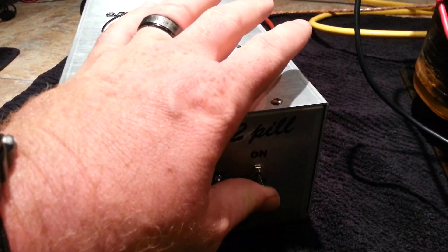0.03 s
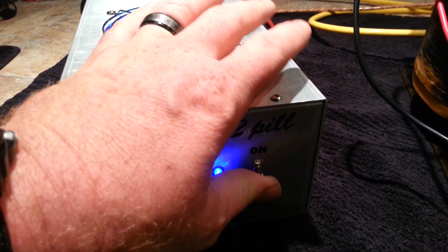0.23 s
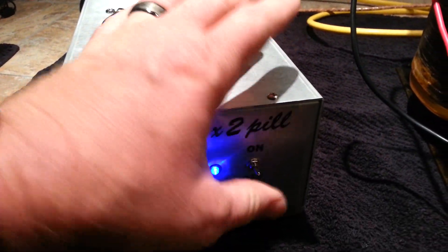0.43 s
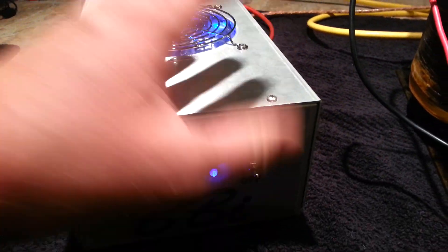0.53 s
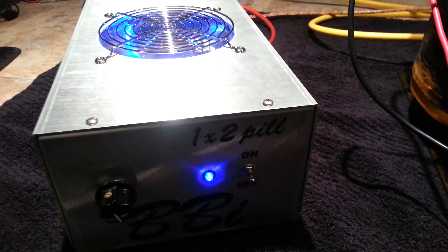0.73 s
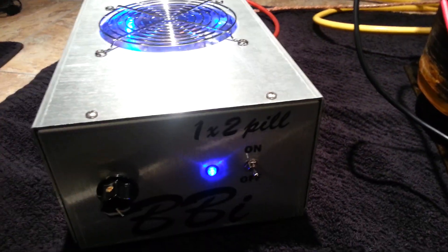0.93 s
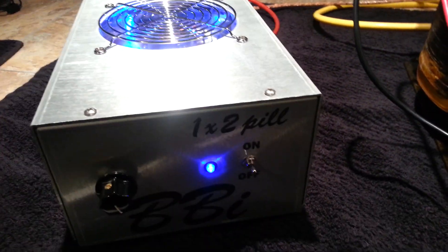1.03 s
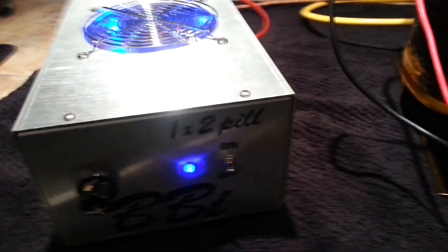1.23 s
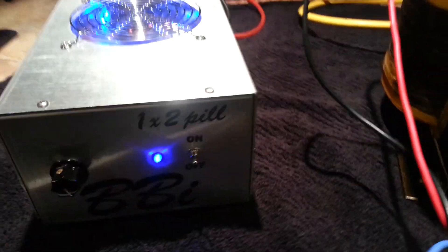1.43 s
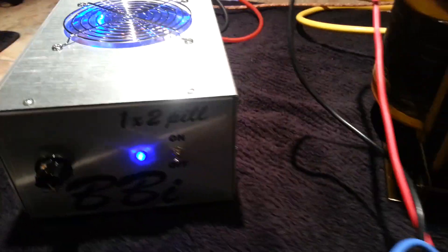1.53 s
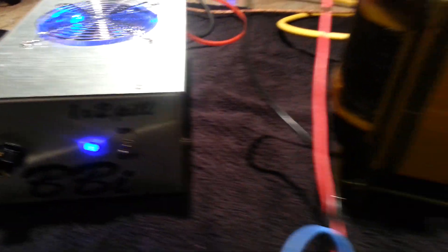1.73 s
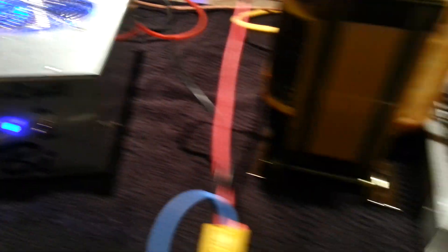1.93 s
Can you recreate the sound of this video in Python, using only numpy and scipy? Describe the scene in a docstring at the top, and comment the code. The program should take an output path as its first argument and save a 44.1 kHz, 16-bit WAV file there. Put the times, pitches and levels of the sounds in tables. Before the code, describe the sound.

A toggle switch snaps at about 0.2 s: a very loud, bright, close click of tightly bunched contacts, ringing a sheet-metal case for roughly 0.3 s with short room echo. Quiet mains hum, room noise and a faint pulsing insect trill run throughout. From 0.25 s a small fan softly ticks ever faster. Cloth rustles from 1 to 1.8 s, with tiny microphone knocks near 1.2 and 1.4 s.

```python
"""Mains hum, room noise and a far insect's trill come first.
A thumb then flips a metal toggle switch on a sheet-metal box: contacts ring the lever and crack,
the snap rings the case panels, the room echoes. The box's fan spins up, ticking ever faster.
Later cloth rustles (two noise bands) and the handheld microphone gets a few small knocks (damped modes)."""
import sys
import numpy as np
from scipy import signal
from scipy.io import wavfile

SR = 44100
rng = np.random.default_rng(int(sys.argv[2]) if len(sys.argv) > 2 else 0)


def unload_audio(sound):
    """Save the sound as a 16-bit wav file, at the path given as the first command line argument."""
    columns = np.transpose(np.atleast_2d(sound))
    # keep every value between -1 and 1, then stretch to whole-number steps
    steps = np.round(np.clip(columns, -1, 1) * 32767)
    wavfile.write(sys.argv[1], SR, steps.astype(np.int16))


N = 88200


def amp(db):
    """dB to gain."""
    return 10 ** (np.asarray(db) / 20)


def rms_one(x):
    """Scale to rms 1."""
    return x / np.sqrt(np.mean(x ** 2) + 1e-20)


def clock():
    """Time of each sample, s."""
    return np.arange(N) / SR


def at_hz(points, hz):
    """Read a (hz, value) table on a log-frequency axis."""
    table_hz, value = np.array(points).T
    return np.interp(np.log(hz), np.log(table_hz), value)


def drift(corner_hz):
    """Slow random wander, rms 1: noise through two equal poles, run at SR / 40."""
    step = 40
    r = np.exp(-2 * np.pi * corner_hz * step / SR)
    settle = 2000
    noise = rng.standard_normal(N // step + settle + 2)
    slow = signal.lfilter([1], [1, -2 * r, r * r], noise)[settle:]
    return np.interp(np.arange(N) / step, np.arange(len(slow)), rms_one(slow))


def clicks(start_s, gains):
    """One impulse per event."""
    out = np.full(N, 1e-18)  # floor avoids denormals
    np.add.at(out, (np.asarray(start_s) * SR).astype(int), gains)
    return out


def ring(x, hz, t60_s):
    """Damped resonator: a unit click starts a decaying sine of height 1."""
    r = amp(-60 / (t60_s * SR))
    w = 2 * np.pi * min(hz, 15000) / SR
    return signal.lfilter([0, np.sin(w)], [1, -2 * r * np.cos(w), r * r], x)


def strike(start_s, level_db, modes, scatter_db):
    """Every blow rings every mode with a random strength of its own."""
    scatter = scatter_db * rng.standard_normal((len(start_s), len(modes)))
    out = 0
    for k, (hz, mode_db, t60_s) in enumerate(modes):
        blows = clicks(start_s, amp(level_db + mode_db + scatter[:, k]))
        out = out + ring(blows, hz, t60_s)
    return out


def dying(x, t60_s):
    """Envelope: each click decays exponentially."""
    return signal.lfilter([1], [1, -amp(-60 / (t60_s * SR))], x)


# left-right correlation of noise: pitch_hz, likeness (0-1)
LIKENESS = [(60, 0.086), (300, 0.45), (700, 0.12), (1400, 0), (3000, 0), (14000, 0.018)]


def banded(spectrum, flicker_db, shape=lambda hz: 1):
    """Third-octave stereo noise, rms 1 before flicker and shape; each band has its own level and likeness."""
    settle = 8000
    edges_hz = 22 * 2 ** np.arange(0, 9.6, 1 / 3)
    white = rng.standard_normal((2, 2, N + settle))  # neighbouring bands use different noise
    out, power = 0, 0
    for k, (low, high) in enumerate(zip(edges_hz, edges_hz[1:])):
        hz = np.sqrt(low * high)
        if not spectrum[0][0] / 2 < hz < spectrum[-1][0] * 2:
            continue
        sos = signal.butter(2, [low, high], "band", fs=SR, output="sos")
        mid, side = signal.sosfilt(sos, white[k % 2])[:, settle:]
        alike = np.clip(at_hz(LIKENESS, hz), -1, 1)
        gain = amp(at_hz(spectrum, hz))
        power += gain ** 2 * (high - low) * 4.4 / SR  # 4.4: filter skirts, two-sided band, mid + side
        flicker = amp(flicker_db * drift(17)) if flicker_db else 1
        stereo = np.sqrt(1 + alike) * mid + np.sqrt(1 - alike) * side * [[1], [-1]]
        out = out + gain * flicker * shape(hz) * stereo
    return out / np.sqrt(power)


def place(x, left_minus_right_db, left_lag_s):
    """Stereo position by level difference and a delayed left channel."""
    t = clock()
    left = np.interp(t - left_lag_s, t, x) * amp(left_minus_right_db / 2)
    right = x * amp(-left_minus_right_db / 2)
    return np.array([left, right])


LOW_CUT_HZ = 351


def low_cut(x):
    """Fourth-order high-pass: the switch and knocks carry no deep bass."""
    return signal.sosfilt(signal.butter(4, LOW_CUT_HZ, "high", fs=SR, output="sos"), x)


MAINS_HZ, HUM_WAVER_DB = 60, .7
# mains harmonics: multiple, level_db (rms), left_minus_right_db
HUM = [(1, -74.5, -3), (2, -69.5, 0.5), (3, -86, -8.5), (4, -62.5, -1), (5, -64.5, 5.5), (6, -68, -1.5),
       (7, -71.5, -1), (8, -65, -1.5), (10, -71, -3.5)]


def hum():
    """Sines at mains multiples; each level wavers slightly."""
    out = 0
    for multiple, level_db, left_minus_right_db in HUM:
        cycles = multiple * MAINS_HZ * clock() + rng.random()
        channel_phase = rng.normal(0, 0.27, (2, 1))
        tone = np.sin(2 * np.pi * cycles + channel_phase)
        pan_db = left_minus_right_db * np.array([[.5], [-.5]])
        out = out + np.sqrt(2) * amp(level_db + HUM_WAVER_DB * drift(4.8) + pan_db) * tone
    return out


ROOM_START_DB, ROOM_RISE_DB_PER_S = -57.5, 2  # steady rise from time 0 stands for air from the fan
# room noise spectrum: pitch_hz, density_db (per Hz, relative)
ROOM = [(20, -29.5), (45, -16.5), (60, -18), (150, -10), (300, -11.5), (500, -16.5), (800, -19.5),
        (1200, -22), (2000, -26), (3500, -29), (6000, -34), (9000, -31.5), (14600, -32)]


def room():
    """Flickering broadband noise whose level climbs steadily."""
    return amp(ROOM_START_DB + ROOM_RISE_DB_PER_S * clock()) * banded(ROOM, 1.0)


INSECT_HZ, INSECT_WIDTH_HZ, INSECT_EDGE_S = 2314, 145, 0.075
# insect phrases: start_s, length_s, level_db
PHRASES = [(-.08, 0.33, -62), (0.473, 0.34, -64), (1.043, .32, -62), (1.661, 0.315, -62)]


def insect():
    """Narrow rough trill: noise through two equal resonators, gated into short phrases."""
    r = np.exp(-np.pi * INSECT_WIDTH_HZ / SR)
    w = 2 * np.pi * INSECT_HZ / SR
    tone = rng.standard_normal((2, N))
    for _ in range(2):
        tone = signal.lfilter([1, 0, -1], [1, -2 * r * np.cos(w), r * r], tone)
    t = clock()
    gate = 0
    for start_s, length_s, level_db in PHRASES:
        edge_distance_s = np.minimum(t - start_s, start_s + length_s - t)
        gate = gate + amp(level_db) * np.clip(edge_distance_s / INSECT_EDGE_S, 0, 1)
    return gate * rms_one(tone)


SNAP_S, SWITCH_LEFT_LAG_S = .2118, .00007
# sheet-metal panels, before the low cut: pitch_hz, level_db, t60_s
CASE = [(288, -34.5, 0.15), (349.3, -25, 0.32), (370.5, -23, 0.28), (392.3, -18, 0.29), (467, -32, 0.033),
        (668.5, -29.5, 0.32), (683.7, -28.5, 0.22), (735, -30.5, 0.14), (802.7, -27.5, 0.148),
        (809, -31, .3), (1052, -20, 0.082), (1407, -23, 0.081), (1490, -28, 0.075), (1640, -38.5, 0.086),
        (1920, -35, 0.18), (2125, -31, .3)]


def case():
    """The snap pushes the panels once; their modes ring."""
    return place(strike([SNAP_S], 0, CASE, 0.17), 0.1, SWITCH_LEFT_LAG_S)


LEVER_SCATTER_DB, LEVER_LEFT_MINUS_RIGHT_DB = 4.5, 3.5
# lever contacts (tick, snap, bounces): start_s, level_db
CONTACTS = [(0.2086, -18), (0.2106, -6), (0.2112, -1), (0.2117, -2), (0.2127, -3), (0.2158, -15),
            (0.2186, -14), (0.2205, -11), (0.2262, -17)]
# lever, bushing and front plate, relative to each contact: pitch_hz, level_db, t60_s
LEVER = [(820, -11, .012), (1834, -17, .02), (1960, -13, .022), (2180, -16, .02), (2420, -15, .03),
         (3270, -13, .012), (3500, -12, .012), (4840, -13, .007), (7050, -16, .005), (8580, -13, .005),
         (10900, -19, .005), (11700, -17, .005), (14250, -6, .003)]


def lever():
    """Every contact rings the lever, bushing and front plate."""
    start_s, level_db = np.transpose(CONTACTS)
    rung = strike(start_s, level_db, LEVER, LEVER_SCATTER_DB)
    return place(rung, LEVER_LEFT_MINUS_RIGHT_DB, SWITCH_LEFT_LAG_S)


CRACK_DB, CRACK_T60_S = -7.5, .006  # level relative to each contact
# crack spectrum: pitch_hz, density_db (per Hz, relative)
CRACK = [(180, -42), (300, -23), (1380, -27), (1980, -10), (4110, -3.5), (4910, -10.5), (6270, -12.5),
         (8680, -2), (13000, -22), (14600, -8)]


def crack():
    """Every contact also fires a dying burst of noise."""
    start_s, level_db = np.transpose(CONTACTS)
    envelope = dying(clicks(start_s, amp(level_db)), CRACK_T60_S)
    return amp(CRACK_DB) * envelope * banded(CRACK, 0)


EARLY_DB, EARLY_T60_S = -18, 0.044  # first reflections from bench and wall
TAIL_DB, ECHO_RISE_S = -22.5, 0.00343  # rise is a time constant
# echo spectrum, early and late: pitch_hz, density_db (per Hz, relative)
TAIL = [(300, -27), (600, -19), (800, -11), (1200, -24.5), (1500, -17), (1960, -12), (2600, -21.5),
        (3200, -20.5), (6000, -26.5), (14600, -24)]
# late echo decay: pitch_hz, t60_s
TAIL_T60 = [(200, 0.68), (1000, 0.36), (4000, 0.4), (14000, 0.19)]


def echo():
    """Room noise after the snap: a quick early decay over a late decay set per band."""
    after_s = np.maximum(clock() - SNAP_S, 0)
    rise = 1 - np.exp(-after_s / ECHO_RISE_S)
    early = amp(EARLY_DB - 60 * after_s / EARLY_T60_S)

    def shape(hz):
        """Echo envelope of one band."""
        late = amp(TAIL_DB - 60 * after_s / at_hz(TAIL_T60, hz))
        return rise * (early + late)

    return banded(TAIL, 0, shape)


def switch():
    """The snap rings the case, contacts ring the lever and crack, the room answers."""
    return low_cut(case() + lever() + crack()) + echo()


FAN_START_S, FAN_TOP_TICKS_PER_S, FAN_SPINUP_S = .2491, 68.9, 1.3175  # spin-up is a time constant
FAN_FIRST_TICK_STEPS, FAN_JITTER_S = .517, .0012
FAN_DRIVE_DB, FAN_SCATTER_DB, FAN_FADE_DB_PER_S = -87.5, 1, 1.2  # drive before the push resonance
FAN_PUSH_HZ, FAN_PUSH_T60_S = 790, 0.016
# case modes rung by the fan: pitch_hz, level_db (relative), t60_s
FAN_MODES = [(785, 0, .075), (822, -1, .075)]


def fan():
    """Speed climbs exponentially toward its top; each motor step nudges the case softly."""
    t = np.maximum(clock() - FAN_START_S, 0)
    spun_s = t - FAN_SPINUP_S * (1 - np.exp(-t / FAN_SPINUP_S))  # integral of relative speed
    steps = FAN_TOP_TICKS_PER_S * spun_s - FAN_FIRST_TICK_STEPS
    tick_s = np.flatnonzero(np.diff(np.floor(steps))) / SR
    tick_s = np.minimum(tick_s + FAN_JITTER_S * rng.standard_normal(len(tick_s)), (N - 1) / SR)
    drive_db = FAN_DRIVE_DB - FAN_FADE_DB_PER_S * tick_s
    ticks = strike(tick_s, drive_db, FAN_MODES, FAN_SCATTER_DB)
    return place(ring(ticks, FAN_PUSH_HZ, FAN_PUSH_T60_S), 0, .00005)


# cloth level points: time_s, low_db, treble_db
RUSTLE = [(0.95, -63.5, -93), (1.1, -54, -68.5), (1.16, -52.5, -66), (1.195, -50.5, -56), (1.235, -55, -68),
          (1.272, -50, -55), (1.295, -64.5, -71), (1.34, -59, -64.5), (1.385, -52, -55.5), (1.41, -62, -68),
          (1.431, -46.5, -48), (1.45, -51.5, -57), (1.488, -65, -80.5), (1.6, -60.5, -65), (1.72, -58, -67),
          (2.0, -81, -83.5)]
# dull part: pitch_hz, density_db (per Hz, relative)
RUSTLE_LOW = [(500, 1.5), (900, 6.5), (2000, 0.5), (3500, -6), (6000, -35.5)]
# bright part: pitch_hz, density_db (per Hz, relative)
RUSTLE_HIGH = [(2000, -27), (3500, 4), (6000, -4), (14000, -8.5)]


def rustle():
    """Cloth rubbing: a dull and a bright flickering noise, each with its own level curve."""
    time_s, low_db, treble_db = np.transpose(RUSTLE)
    t = clock()
    dull = amp(np.interp(t, time_s, low_db)) * banded(RUSTLE_LOW, 2.1)
    bright = amp(np.interp(t, time_s, treble_db)) * banded(RUSTLE_HIGH, 2.4)
    return (t > time_s[0]) * (dull + bright)


KNOCK_SNAP_T60_S = .003
# knocks, before the low cut: start_s, ring_db, snap_db
KNOCKS = [(1.1786, -37, -58), (1.4164, -30, -27), (1.4284, -36, -54), (1.4358, -38, -47)]
# microphone shell: pitch_hz, level_db (relative), t60_s
KNOCK_MODES = [(1150, 2.5, 0.0046), (1480, -7, 0.012), (3070, -12.5, 0.0055)]


def knocks():
    """Small knocks on the microphone's shell: dull modal ring and thin noise snap."""
    start_s, ring_db, snap_db = np.transpose(KNOCKS)
    snap = dying(clicks(start_s, amp(snap_db)), KNOCK_SNAP_T60_S) * rng.standard_normal((2, N))
    shell = strike(start_s, ring_db, KNOCK_MODES, 1.5)
    return place(low_cut(shell), 0.84, .00004) + low_cut(snap)


def scene():
    """Sum of all sources."""
    return hum() + room() + insect() + switch() + fan() + rustle() + knocks()


OVERLOAD, CUTOFF_HZ = .9, 14600  # clip level relative to full scale


def record(dry):
    """Peaks clip hard, then a steep low-pass cuts the top."""
    clipped = np.clip(dry, -OVERLOAD, OVERLOAD)
    return signal.sosfilt(signal.ellip(10, .5, 60, CUTOFF_HZ, fs=SR, output="sos"), clipped)


dry = scene()
out = record(dry)
unload_audio(out)
```